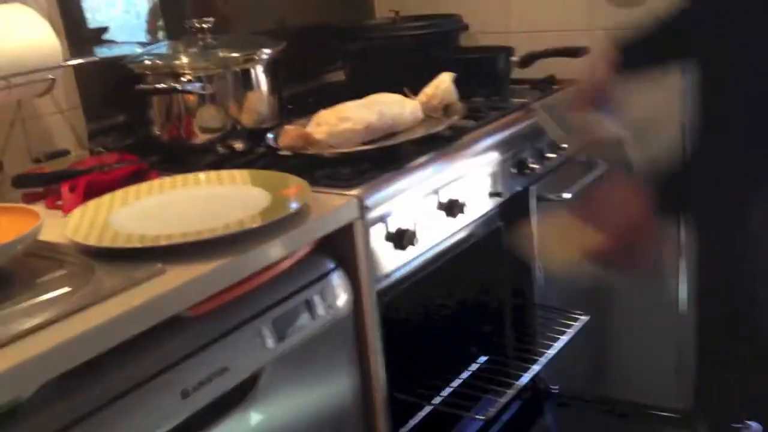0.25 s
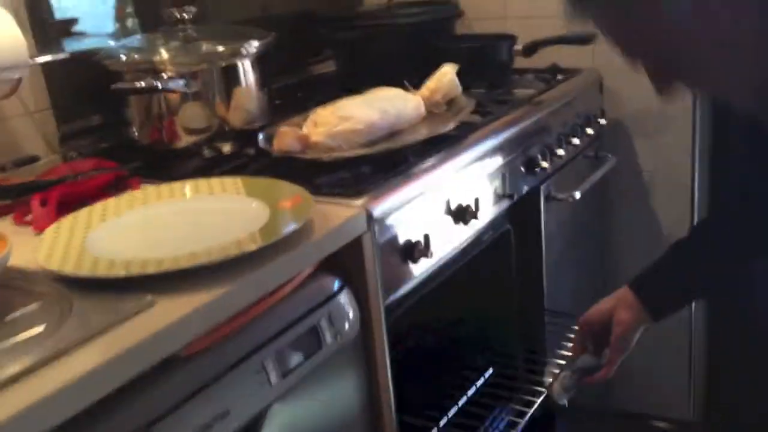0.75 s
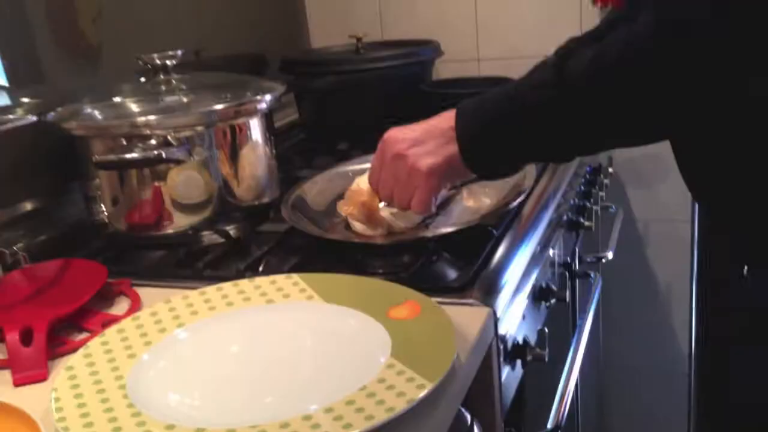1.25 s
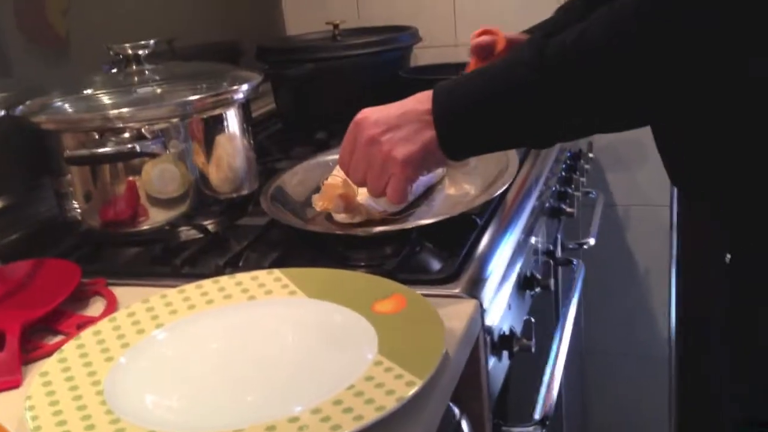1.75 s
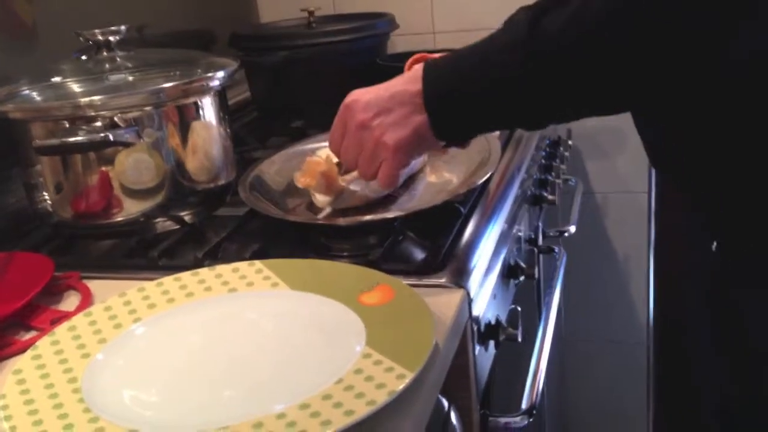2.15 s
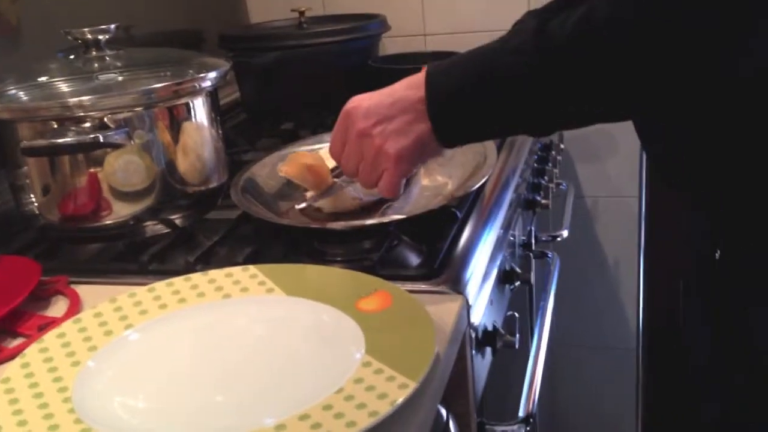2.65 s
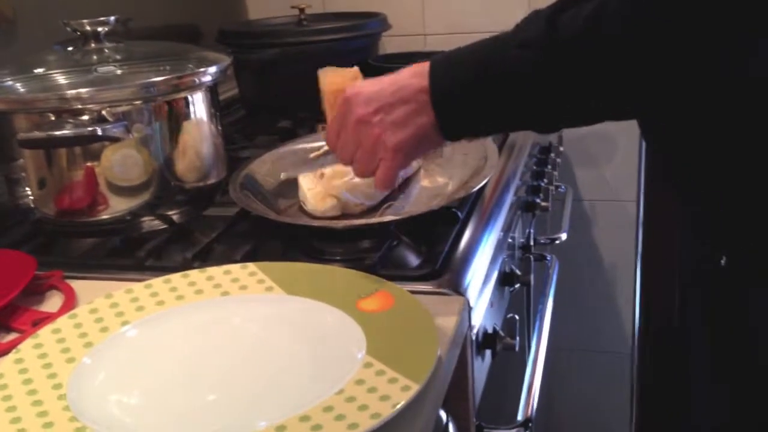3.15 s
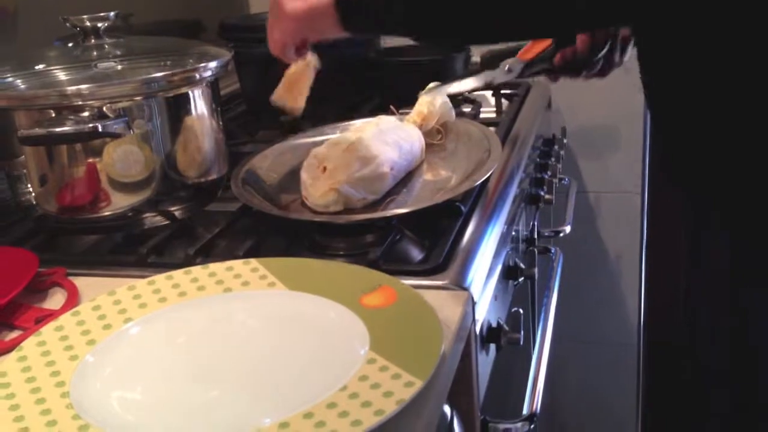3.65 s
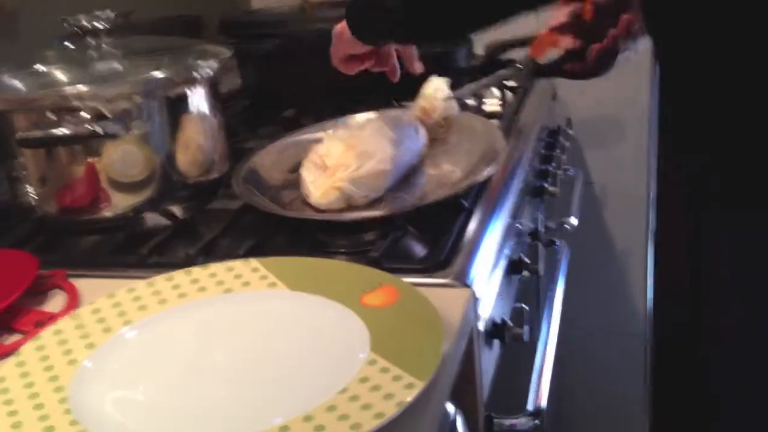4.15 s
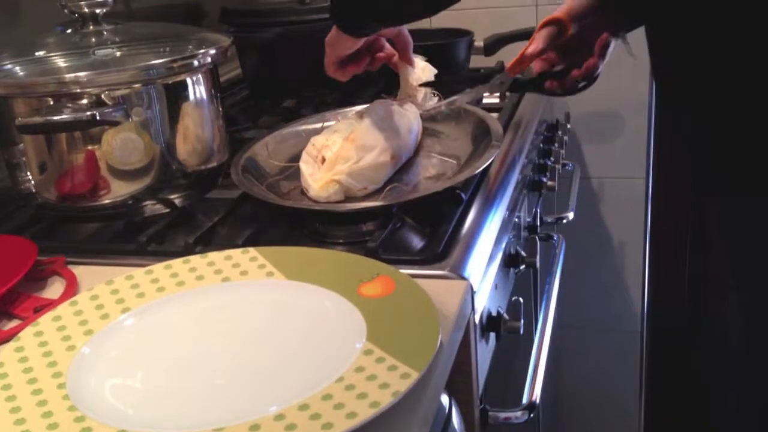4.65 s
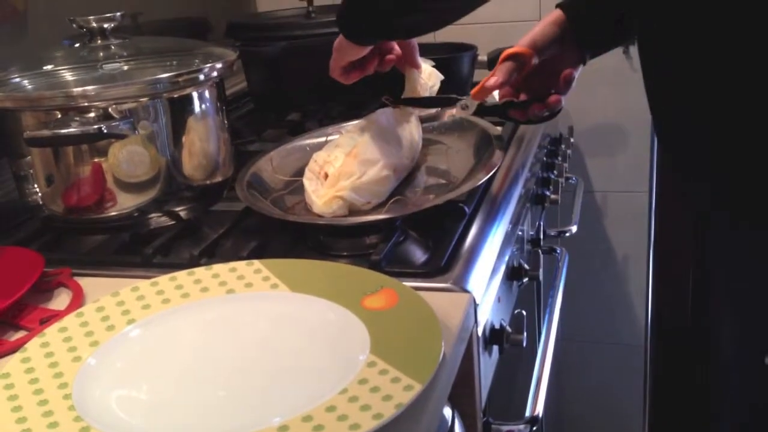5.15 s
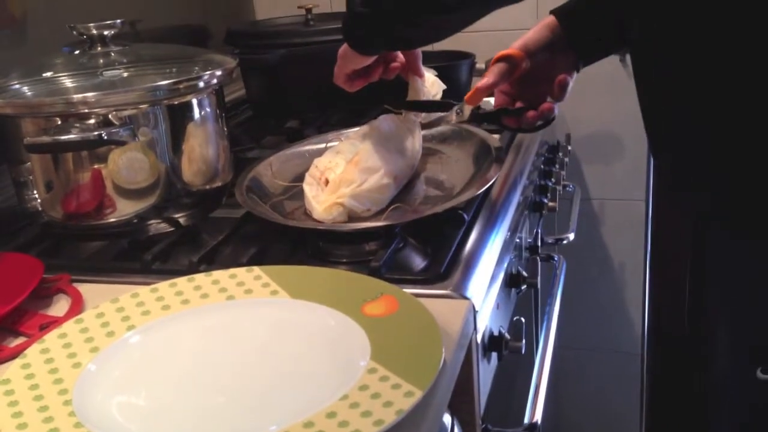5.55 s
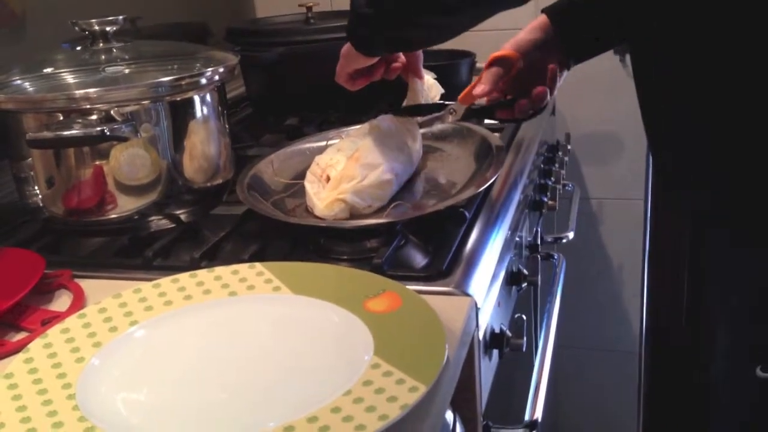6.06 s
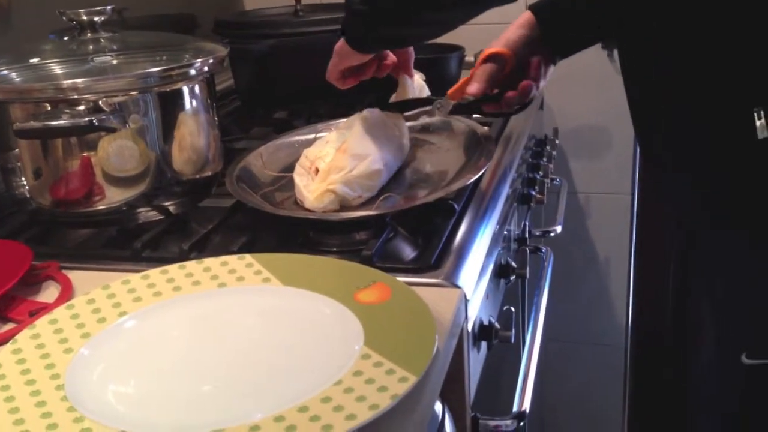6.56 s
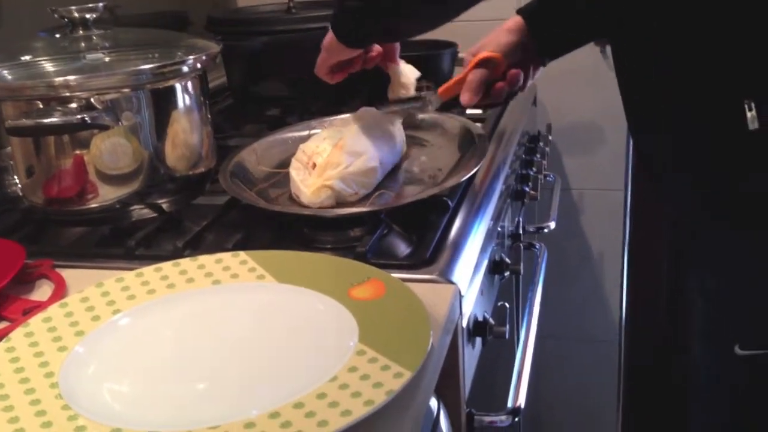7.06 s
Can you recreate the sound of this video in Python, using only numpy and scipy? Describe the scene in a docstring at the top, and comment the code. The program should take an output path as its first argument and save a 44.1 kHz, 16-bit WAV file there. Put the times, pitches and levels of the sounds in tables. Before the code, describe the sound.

A light paper rustle and dull tray thud come first, followed by a rough rattling oven rack with hollow sheet-metal knocks. After a momentary dropout, stiff paper crackles in uneven clumps, a steel tray rocks on its grate, and scissors snip near the middle and again at the end. Close handheld microphone, short hard kitchen reverberation, quiet low hum.

```python
"""A steel tray is set down on a stove grate; a wire rack then scrapes into the oven, whose sheet metal booms.
The level dips to silence briefly; then hands crinkle a paper parcel and scissors snip its two twisted ends.
Scrape and crackle are coloured random grains, snaps and snips decaying noise, clinks and booms damped modes.
The tray clinks and rocks on the grate; a small tiled kitchen reverberates over soft air noise and hum."""
import sys
import numpy as np
from scipy import signal
from scipy.fft import rfft, irfft, next_fast_len
from scipy.io import wavfile
from scipy.ndimage import map_coordinates

SR = 44100
rng = np.random.default_rng(int(sys.argv[2]) if len(sys.argv) > 2 else 0)


def master_out(mix):
    """Clip the mix to full scale and print it as 16-bit PCM to the path in sys.argv[1]."""
    frames = np.transpose(np.atleast_2d(mix))
    ceiling = np.clip(frames, -1, 1)
    pcm = np.round(ceiling * 32767).astype(np.int16)
    wavfile.write(sys.argv[1], SR, pcm)


N = 321533
TIME_S = np.arange(N) / SR
HIT_S = TIME_S[:SR // 2]  # time since a blow
DIP_S, TOP_HZ = 1.343, 15350

# Reverberation of the kitchen. Each row: frequency in Hz, t60 in s.
KITCHEN_T60 = [(150, 0.69), (600, 0.46), (2000, 0.4), (6000, 0.36), (14000, 0.18)]


def amp(db):
    """Decibels to gain."""
    return 10 ** (np.asarray(db) / 20)


def unit(x):
    """x at rms 1."""
    return x / np.sqrt(np.mean(x ** 2) + 1e-20)


def along(points, hz):
    """(Hz, value) points interpolated on a log frequency axis."""
    f, v = np.transpose(points)
    return np.interp(np.log(hz + 1), np.log(f + 1), v)


def level(rows, column):
    """Gain over time of a dB curve, -120 dB outside its span."""
    rows = np.asarray(rows)
    return amp(np.interp(TIME_S, rows[:, 0], rows[:, column], left=-120, right=-120))


def wobble(rate):
    """A smooth random curve, rate knots a second."""
    knots = rng.standard_normal(int(N * rate / SR) + 4)
    return map_coordinates(knots, [TIME_S * rate])


def add(track, s, sound):
    """Mix a sound into the track at time s."""
    room = track[max(round(s * SR), 0):][:len(sound)]
    room += sound[:len(room)]


def coloured(x, spectrum, size=4096):
    """x through a minimum-phase filter of unit energy with this (Hz, dB) spectrum."""
    gain = amp(along(spectrum, np.fft.rfftfreq(size, 1 / SR)))
    cepstrum = irfft(np.log(gain + 1e-6))
    # fold the cepstrum to make the filter causal
    cepstrum[1:size // 2] *= 2
    cepstrum[size // 2 + 1:] = 0
    kernel = irfft(np.exp(rfft(cepstrum)))
    return signal.fftconvolve(x, kernel / np.linalg.norm(kernel))[:len(x)]


def grains(rate, spread_db):
    """Random tiny impulses of very uneven size, rate a second, rms 1."""
    hits = (rng.random(N) < rate / SR) * rng.standard_normal(N)
    size_db = spread_db * np.clip(rng.standard_normal(N), -2, 2)
    return unit(hits * amp(size_db))


def patchy(x, depth_db, size):
    """The colour of x shifts at random over time and frequency, as when a point of contact moves; rms 1."""
    z = signal.stft(x, nperseg=512)[2]
    patch = np.outer(np.hanning(6), np.hanning(size))
    field = signal.fftconvolve(rng.standard_normal(z.shape), patch, mode="same")
    return unit(signal.istft(z * amp(depth_db * unit(field)), nperseg=512)[1][:len(x)])


def burst(t60):
    """A dying puff of noise for a flurry of micro-contacts."""
    return rng.standard_normal(len(HIT_S)) * amp(-60 * HIT_S / t60)


def ring(modes):
    """Steel modes struck at new strengths, each decaying at its own t60, starting near rms 1."""
    hz, db, t60 = np.transpose(modes)[:, :, None]
    gain = amp(db + rng.normal(0, 1.2, db.shape))
    waves = np.sin(2 * np.pi * (hz * HIT_S + rng.random(hz.shape)))
    decaying = gain * waves * amp(-60 * HIT_S / t60)
    return np.sum(decaying, axis=0) / np.sqrt(np.sum(gain ** 2) / 2)


def rack():
    """The wire rack chatters along its runners, harder after each catch; every slip scrapes and shakes the oven."""
    # Catches on the runners. Each row: start in s, level in dB before trims.
    jolt_rows = [(0.864, -18), (0.89, -19.5), (1.011, -20), (1.023, -19), (1.091, -21), (1.177, -19.5),
                 (1.199, -17), (1.3, -26.5)]
    # Heavy knocks on the oven wall. Each row: start in s, level in dB before trim.
    knock_rows = [(0.866, -22.5), (1.024, -23), (1.062, -22), (1.102, -24.5), (1.131, -25), (1.158, -30),
                  (1.201, -23.5)]
    # Colour of wire on runner. Each row: frequency in Hz, relative level in dB.
    scrape_colour = [(90, -22), (200, -2), (450, 5), (750, -4.5), (1100, -1.5), (1800, -4), (3000, -8.5),
                     (4500, -10), (6500, -16), (9500, -25), (15000, -38)]
    # one shove sends the rack in, then it coasts to rest
    shove_start_s, shove_length_s, coast_db_per_s = 0.862, 0.36, 170
    scrape_db, boom_db = -35.5, -36
    chatter_db, chatter_t60_s = -13.5, 0.25

    slips = grains(rate=2200, spread_db=2.0) * amp(2.8 * wobble(130))
    slips = patchy(slips, depth_db=3.0, size=7)
    coasting_s = np.maximum(TIME_S - shove_start_s - shove_length_s, 0)
    speed = (TIME_S > shove_start_s) * amp(-coast_db_per_s * coasting_s)
    jolts, pushes, chatter = np.zeros(N), np.zeros(N), np.zeros(N)
    push = np.cos(2 * np.pi * 175 * HIT_S) * np.exp(-HIT_S / 0.0022)  # the wall gives and springs back
    for s, db in jolt_rows:
        add(jolts, s, amp(db - 10.0) * burst(t60=0.11))
        add(chatter, s, amp(db + chatter_db - 60 * HIT_S / chatter_t60_s))
    for s, db in knock_rows:
        add(pushes, s, amp(db - 8) * push)
    scraping = slips * np.hypot(amp(scrape_db) * speed, chatter) + jolts
    shaking = slips * amp(boom_db) * speed + amp(-5.5) * jolts + pushes
    return coloured(scraping, scrape_colour) + stove(shaking)


def stove(x):
    """x through the damped resonances of the stove's sheet metal, at unit energy."""
    # Each row: frequency in Hz, width in Hz, relative level in dB.
    stove_modes = [(91, 11.5, -4.5), (127, 13, -3), (164.4, 15, -1), (253, 16, 1), (294, 11, -0.5),
                   (436, 10, 1.5), (508, 14, -1.5), (583, 6.7, 5), (954, 23, -5), (970, 22, -0.5),
                   (1242, 9.9, -9), (1475, 14, -5.5), (1680, 42, -14), (1820, 17, -2), (2295, 51, -19),
                   (2725, 44, -7)]
    body = np.zeros(len(HIT_S))
    for k, (hz, width_hz, db) in enumerate(stove_modes):
        decay = width_hz * np.exp(-np.pi * width_hz * HIT_S)
        body += (-1) ** k * amp(db) * decay * np.sin(2 * np.pi * hz * HIT_S)
    return signal.fftconvolve(x, body / np.linalg.norm(body))[:N]


def tray():
    """The loaded tray thuds softly on the grate, ringing its low modes; its rim rings when steel touches it."""
    # Colour of tray and grate together. Each row: frequency in Hz, relative level in dB.
    thud_colour = [(70, -17), (150, -1), (265, -0.5), (350, -2), (580, -3.5), (750, -13), (1200, -11),
                   (2500, -22), (8000, -45)]
    # Low modes of the tray resting on the grate. Each row: frequency in Hz, relative level in dB, t60 in s.
    grate_modes = [(184, -9, 0.18), (250, -2, 0.16), (276, 0.5, 0.18), (325, -3.5, 0.2), (462, -8.5, 0.083),
                   (597, -5.5, 0.17), (783, -16.5, .15)]
    # Steel touching the rim. Each row: start in s, level in dB before trim.
    clink_rows = [(2.9176, -37), (2.921, -31), (2.9235, -29.5), (5.575, -42.5), (6.933, -42.5)]
    # Modes of the rim. Each row: frequency in Hz, relative level in dB, t60 in s.
    rim_modes = [(1420, -20, 0.1), (1824, 0, 0.075), (2633, -0.5, 0.093), (3140, -1.5, 0.12),
                 (3586, -6, 0.11), (3685, 3, 0.1), (3870, -6.5, 0.11), (4045, 0, 0.13), (4740, -15, .18),
                 (5220, -3.5, 0.084), (5739, -9, 0.11), (6330, -1, 0.078), (6750, -6.5, 0.11),
                 (7674, -8, .14)]
    blows, metal = np.zeros(N), np.zeros(N)
    cushion = 1 - np.exp(-HIT_S / 0.0031)
    for s, db in rocking(count=3):
        add(blows, s, amp(db - 8) * cushion * burst(t60=0.21))
        add(metal, s, amp(db - 6.5) * cushion * ring(grate_modes))
    for s, db in clink_rows:
        add(metal, s, amp(db - 0.5) * (ring(rim_modes) + amp(2) * burst(t60=0.025)))
    return coloured(blows, thud_colour) + metal


def rocking(count):
    """(s, dB) of every contact: each bump repeats, weaker each time, as the tray settles."""
    # Each row: start in s, level in dB before trims, loss from rock to rock in dB.
    bump_rows = [(0.099, -32.5, 1.5), (1.466, -29.5, 3), (2.932, -29, 17), (4.973, -41, 2), (5.82, -46, 7),
                 (6.428, -38.5, 11), (6.59, -40.5, 8.5), (6.679, -38.5, 1.5), (6.806, -38, 8.5)]
    rock_s = 0.037  # from one contact to the next
    return [(s + k * rock_s, db - k * loss_db) for s, db, loss_db in bump_rows for k in range(count)]


def paper():
    """Clumps of fine crackles under the fingers, with single louder snaps as creases buckle, each its own colour."""
    # Squeezes by fingers or blades. Each row: start in s, length in s, rustle in dB before trim.
    squeeze_rows = [(0.022, 0.033, -39.5), (0.093, 0.16, -49.5), (1.448, 0.16, -36), (1.657, 0.045, -47),
                    (1.76, 0.012, -42), (2.18, 0.018, -49.5), (2.307, 0.11, -48.5), (2.429, 0.021, -37.5),
                    (2.53, 0.02, -50), (2.651, 0.033, -47.5), (2.813, 0.24, -44), (3.428, 0.012, -47),
                    (4.03, 0.28, -57.5), (4.404, 0.14, -33), (4.661, 0.077, -39), (4.889, 0.011, -32.5),
                    (4.934, 0.26, -49), (5.19, 0.42, -49), (5.94, 0.56, -53), (6.144, 0.08, -41),
                    (6.586, 0.19, -41.5), (6.89, 0.17, -49), (6.921, 0.015, -44), (7.275, 0.01, -33.5)]
    # Stiff creases buckling. Each row: start in s, level in dB before trim, low-band offset in dB.
    snap_rows = [(1.5628, -23, -11), (1.6142, -26.5, -10), (2.2967, -30.5, -12), (2.3575, -31, -6.5),
                 (2.389, -26, -16), (2.5222, -16.5, -19.5), (2.6484, -30.5, -15), (2.6658, -28, -17.5),
                 (3.4186, -30.5, -28), (3.8591, -40.5, -20), (3.9769, -32, -14), (4.0178, -36, -6),
                 (4.0457, -36.5, -9.5), (4.137, -34, -4), (4.3999, -18.5, -9), (4.5176, -20.5, -14.5),
                 (4.5627, -24, -9), (4.6723, -26.5, -6), (4.7252, -21, -7), (4.8344, -28, -14),
                 (5.028, -38, 6.5), (5.1542, -22.5, -8.5), (5.1901, -18, -16), (5.8132, -43.5, 7.5),
                 (6.0127, -29, -14), (6.0771, -34.5, -12), (6.2986, -28.5, -26), (6.42, -35.5, -2),
                 (6.6732, -26, -7), (6.7092, -23, -15), (6.8753, -35, -7)]
    # Colour of the sheet. Each row: frequency in Hz, relative level in dB.
    paper_colour = [(250, -44), (500, -14), (1000, -10.5), (1500, -4.5), (2400, 1.5), (4000, 0.5),
                    (6500, -2.5), (9200, -6), (15500, -11.5)]
    spike_db = 10  # the instant of buckling, over the crackle that follows

    effort = np.sqrt(sum(squeeze(*row) ** 2 for row in squeeze_rows))
    crackle = grains(rate=7000, spread_db=3.5) * amp(3.16 * wobble(90))
    crackle = patchy(crackle, depth_db=3.0, size=6)
    sheet = amp(-4.0) * effort * crackle
    facets_hz = np.geomspace(1500, 15000, 14)
    for s, db, low_db in [*snap_rows, *creases(effort)]:
        snap = burst(t60=0.015) + amp(-7.0) * burst(t60=0.063)
        snap[0] += amp(spike_db)
        # each crease favours its own few frequencies
        tilt_db = along([(2500, low_db + 7), (7000, 0)], facets_hz)
        colour_db = tilt_db + rng.normal(0, 1.8, len(facets_hz))
        add(sheet, s, amp(db - 4.0) * coloured(snap, np.transpose([facets_hz, colour_db])))
    return coloured(sheet, paper_colour)


def squeeze(s, length_s, db):
    """Rustle gain of one squeeze: it builds up, eases as the paper gives, and is let go."""
    grip_db_per_s, ease_db_per_s, let_go_db_per_s = 526, 15, 312
    t = TIME_S - s
    drop_db = grip_db_per_s * np.maximum(-t, 0)
    drop_db += ease_db_per_s * np.clip(t, 0, length_s)
    drop_db += let_go_db_per_s * np.maximum(t - length_s, 0)
    return amp(db - np.minimum(drop_db, 100))


def creases(effort):
    """Small creases give way at random, as strong as the squeeze then: (s, dB, low-band offset dB) rows."""
    rate_per_s, over_rustle_db, spread_db, low_db = 14, 7.5, 0.5, -14
    draws = rng.random((300, 2))
    times_s = np.cumsum(-np.log(1 - draws[:, 0])) / rate_per_s
    effort_db = 20 * np.log10(np.interp(times_s, TIME_S, effort, right=0) + 1e-9)
    snap_db = effort_db + over_rustle_db + spread_db * (2 * draws[:, 1] - 1)
    return [(s, db, low_db) for s, db in zip(times_s, snap_db) if db > -60]


def scissors():
    """The blades crack through the twisted paper and slam on their stop; the hand damps their ring."""
    # Each row: start in s, level in dB before trim, t60 in s, low-band weight in dB.
    snip_rows = [(3.083, -33, .03, -9), (3.086, -28, 0.17, -8), (3.0963, -14, 0.041, -6.5),
                 (3.1001, -13, 0.029, -3), (7.0294, -27, 0.046, -20), (7.0334, -18, 0.052, -1),
                 (7.0366, -14, 0.091, 8)]
    # Colour of the blades. Each row: frequency in Hz, relative level in dB.
    blade_colour = [(70, -29), (150, -16.5), (260, -2.5), (450, -12.5), (730, -5), (1000, -7), (1400, -0.5),
                    (1900, -2), (2400, 1), (3200, -2.5), (5500, 0), (9000, -3), (15000, -7)]
    crack = np.zeros(N)
    for s, db, t60, weight_db in snip_rows:
        add(crack, s, amp(db + 1.5) * coloured(burst(t60), [(700, weight_db), (2500, 0)]))
    return coloured(crack, blade_colour)


def kitchen(x, early_db, late_db):
    """Hob and tiles answer at once, the room later; the noise-built answer is redrawn three times a second."""
    wet = np.zeros(N)
    step = SR // 3
    for start in range(0, N, step):
        hz, t, z = signal.stft(rng.standard_normal(SR * 3 // 4), SR, nperseg=256)
        decay = amp(-60 * t / along(KITCHEN_T60, hz)[:, None])
        tail = signal.istft(z * decay, SR, nperseg=256)[1][:len(HIT_S)]
        early = burst(t60=0.057) * (HIT_S > .002)
        tail = tail * (1 - np.exp(-HIT_S / 0.015))
        answer = amp(early_db) * early / np.linalg.norm(early)
        answer += amp(late_db) * tail / np.linalg.norm(tail)
        add(wet, start / SR, signal.fftconvolve(x[start:start + step], answer))
    return x + wet


def wash(x, wet_db):
    """Pots and shelves scatter the treble into a diffuse, dying hiss: noise shaped by its smeared energy."""
    treble = signal.sosfilt(signal.butter(2, 1000, "high", fs=SR, output="sos"), x)
    hz, t, z = signal.stft(treble, SR, nperseg=256)
    lag_s = t[t < .7]
    # the kernel smears energy, so its onset is squared and its decay doubled in dB
    decay = amp(-120 * lag_s / along(KITCHEN_T60, hz)[:, None]) * (1 - np.exp(-lag_s / 0.0034)) ** 2
    decay = decay / decay.sum(axis=1, keepdims=True)
    energy = np.abs(signal.fftconvolve(np.abs(z) ** 2, decay, axes=1))[:, :len(t)]
    hiss = patchy(rng.standard_normal(N), depth_db=0.5, size=16)
    noise = signal.stft(hiss, nperseg=256)[2]
    return amp(wet_db) * signal.istft(noise / noise.std() * np.sqrt(energy), nperseg=256)[1][:N]


def background():
    """Soft air noise, a motor's wavering hum, 30 dB weaker before the dip, and its thin fuzzy whine."""
    # Colour of the air noise. Each row: frequency in Hz, relative level in dB.
    air_colour = [(20, -75), (35, -21), (60, -14), (100, -9.5), (130, -16), (200, -13.5), (340, -13),
                  (550, -18.5), (950, -21.5), (1200, -26), (2100, -23), (3000, -30), (4000, -28.5),
                  (15500, -40)]
    # Motor tones. Each row: frequency in Hz, peak level in dB, unsteadiness in Hz.
    hum_rows = [(100.3, -54.5, 1.4), (205.5, -72, 3.82), (341, -64.5, 8.25)]
    # Level of the whine. Each row: time in s, level in dB before trim.
    whine_rows = [(0, -59), (1.3, -61.5), (1.9, -62.5), (4.2, -64), (4.8, -65.5), (7.29, -68)]
    air_db, whine_hz, whine_knots_per_s = -54.5, 960, 36

    drift_db = 0.7 * wobble(4)
    air = amp(air_db + drift_db) * unit(coloured(rng.standard_normal(N), air_colour))
    hum = sum(amp(db) * tone(hz, drift_hz) for hz, db, drift_hz in hum_rows)
    hum_gain = np.where(TIME_S < DIP_S, amp(-30), 1)
    phase = 2 * np.pi * whine_hz * TIME_S
    # random sidebands make the whine fuzzy
    whine = wobble(whine_knots_per_s) * np.cos(phase) + wobble(whine_knots_per_s) * np.sin(phase)
    return air + hum_gain * hum + amp(-3.0) * level(whine_rows, column=1) * unit(whine)


def tone(hz, drift_hz):
    """A sine that wavers in pitch and level."""
    phase = 2 * np.pi * np.cumsum(hz + drift_hz * wobble(25)) / SR
    return amp(0.76 * wobble(3.92)) * np.sin(phase)


def scene():
    """Rack and oven sound until the dip; tray, paper, scissors and background run throughout."""
    oven = kitchen(rack(), early_db=-7.0, late_db=-8) * (TIME_S < DIP_S)
    thuds = kitchen(tray(), early_db=-3.5, late_db=-9)
    cutting = scissors() + paper()
    hob = kitchen(cutting, early_db=-7.5, late_db=-11) + wash(cutting, wet_db=-8.0)
    return (oven + thuds + hob + background())[None]


def record(dry):
    """The level fades to silence and back around the dip; nothing passes above the band limit."""
    fade = np.clip(np.abs(TIME_S - DIP_S) / 0.029, 0, 1) ** 1.2
    size = next_fast_len(N + SR // 2)
    passband = np.fft.rfftfreq(size, 1 / SR) < TOP_HZ
    return irfft(rfft(dry * fade, size) * passband, size)[:, :N]


dry = scene()
out = record(dry)
master_out(out)
```